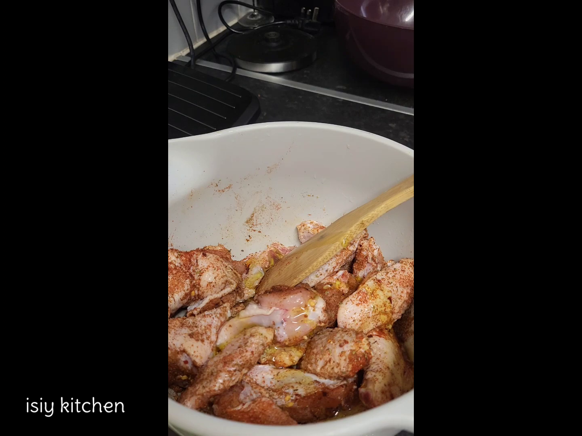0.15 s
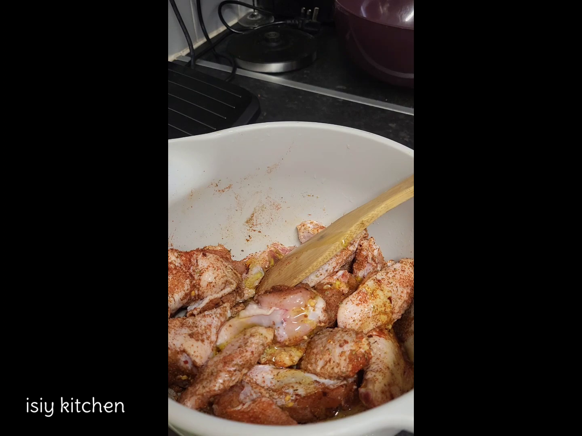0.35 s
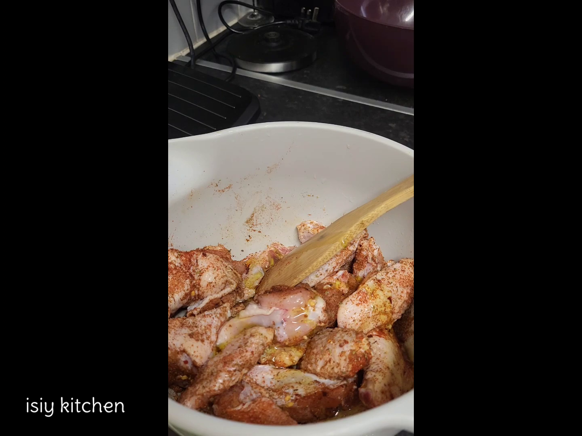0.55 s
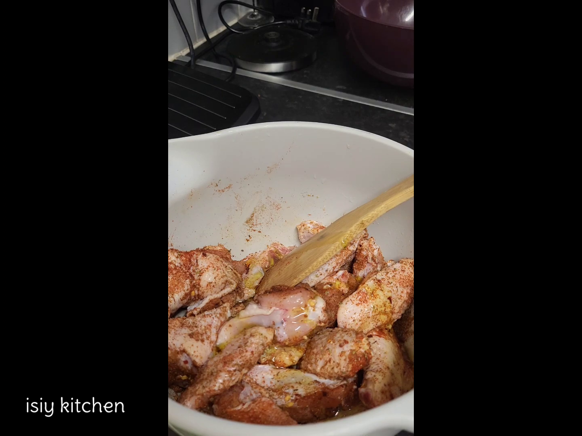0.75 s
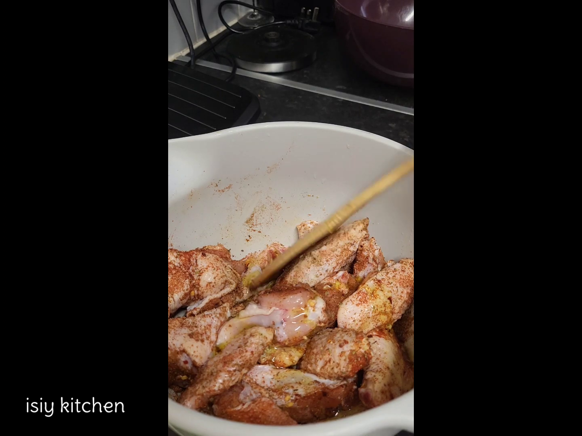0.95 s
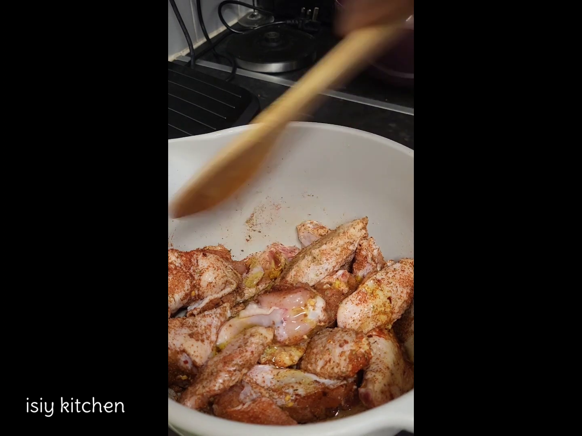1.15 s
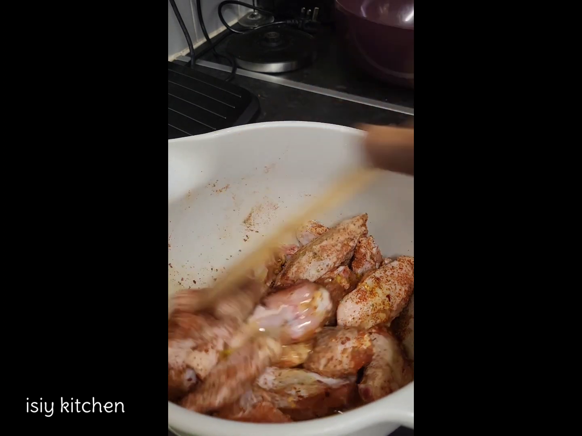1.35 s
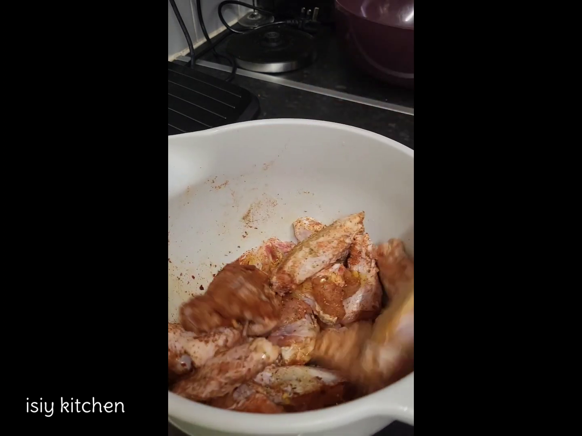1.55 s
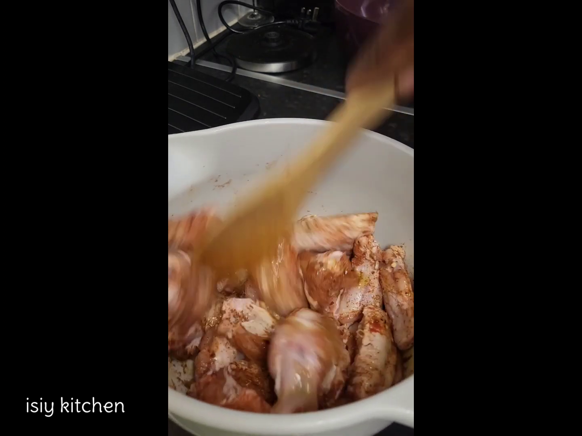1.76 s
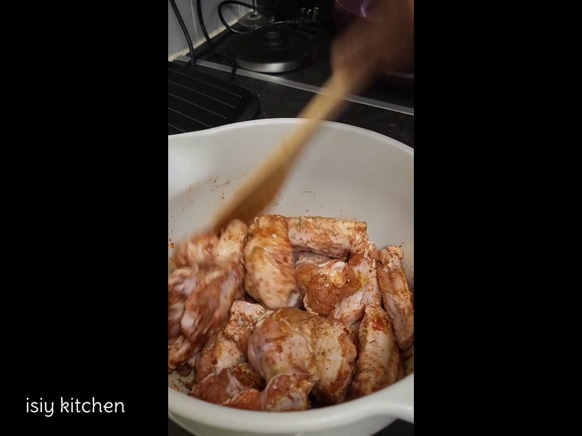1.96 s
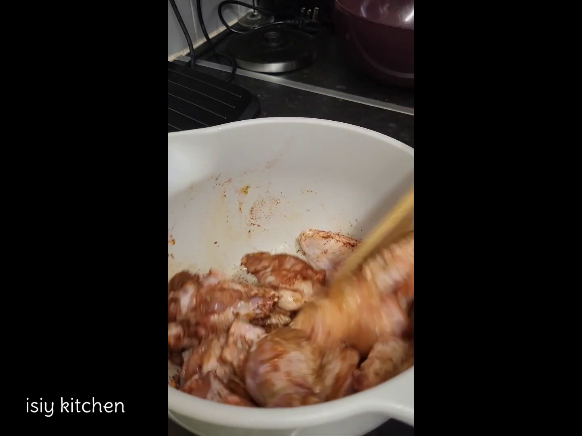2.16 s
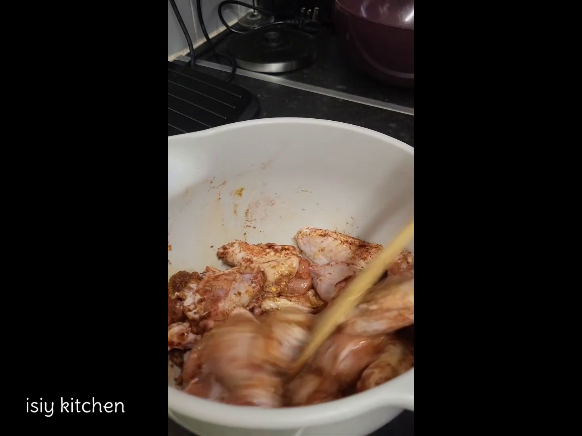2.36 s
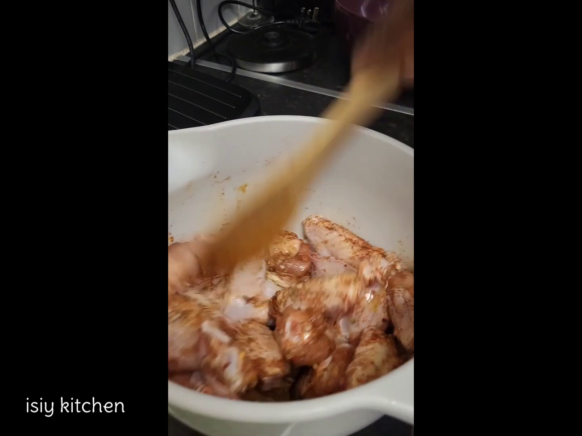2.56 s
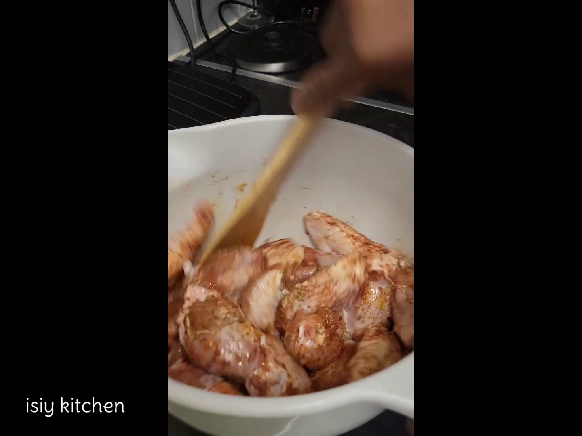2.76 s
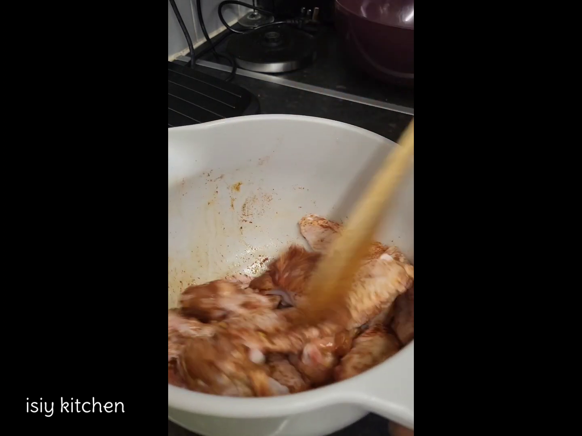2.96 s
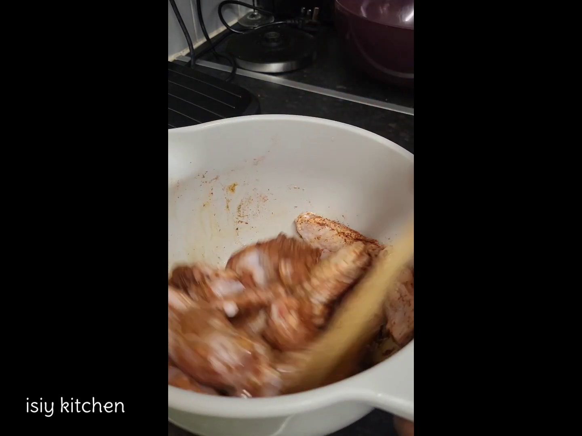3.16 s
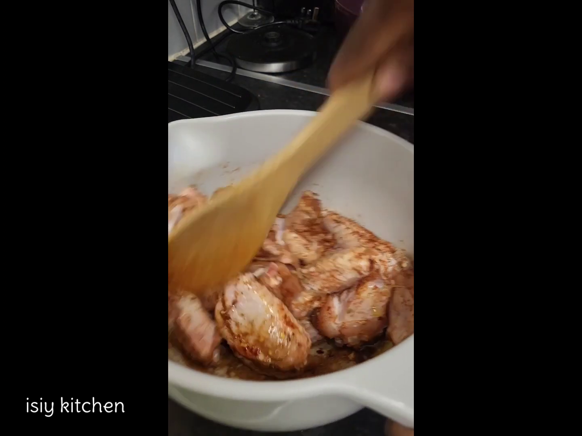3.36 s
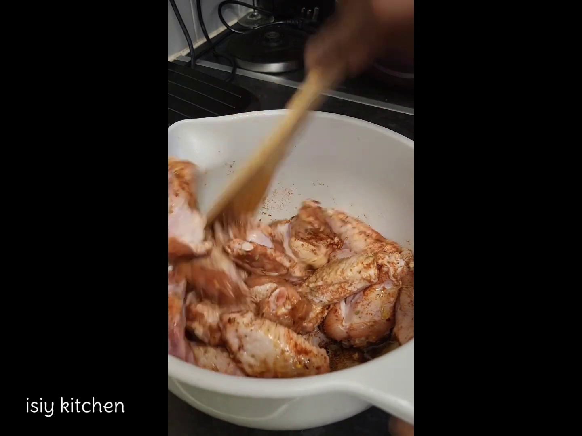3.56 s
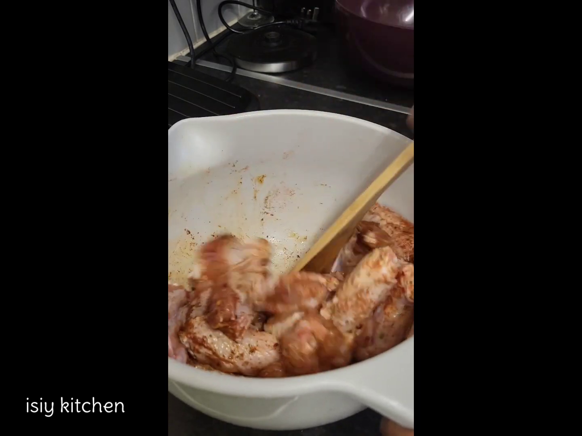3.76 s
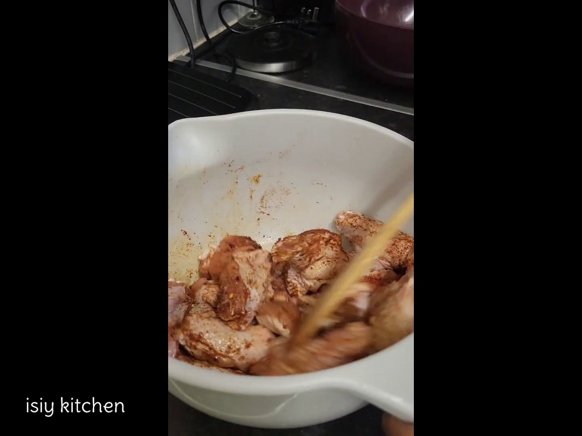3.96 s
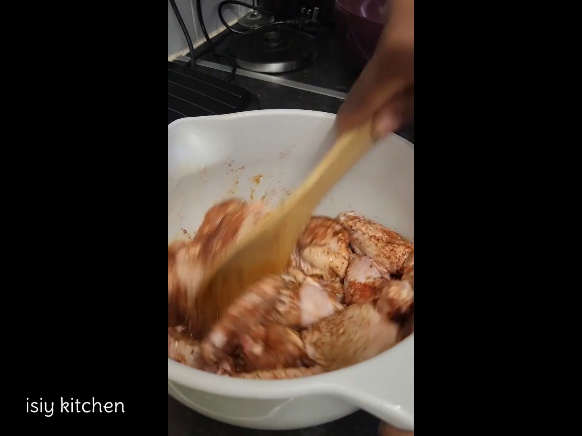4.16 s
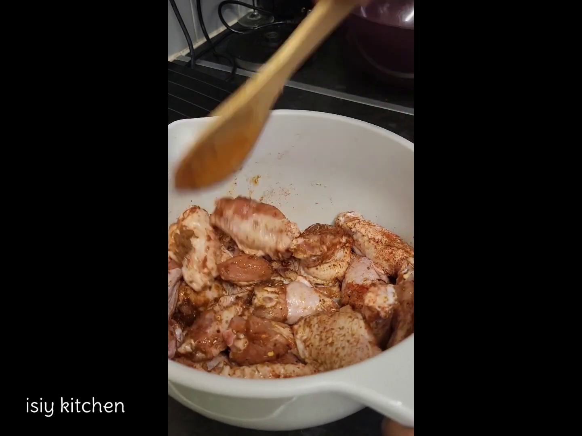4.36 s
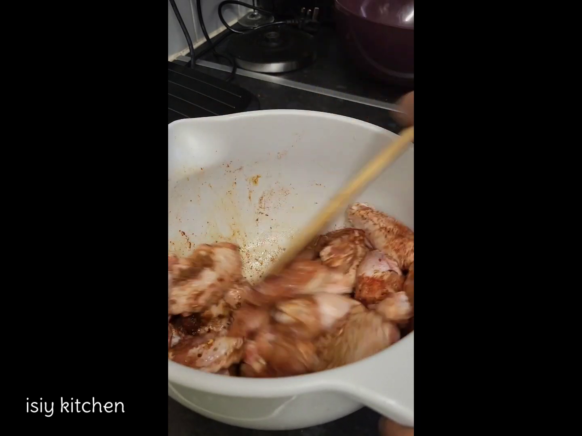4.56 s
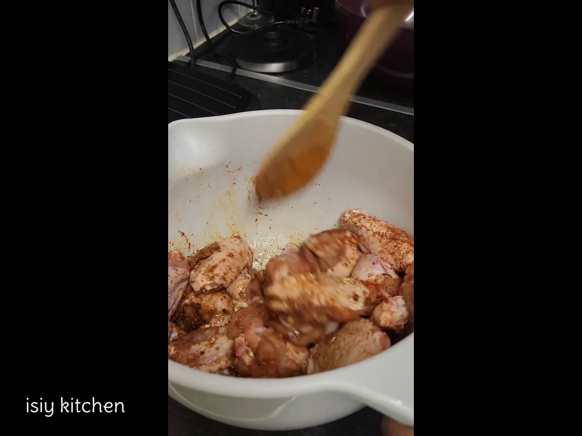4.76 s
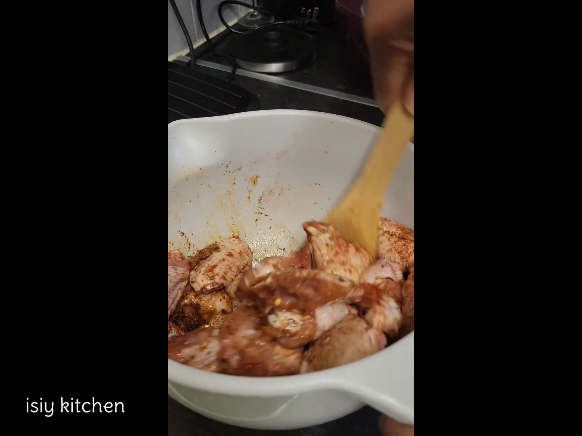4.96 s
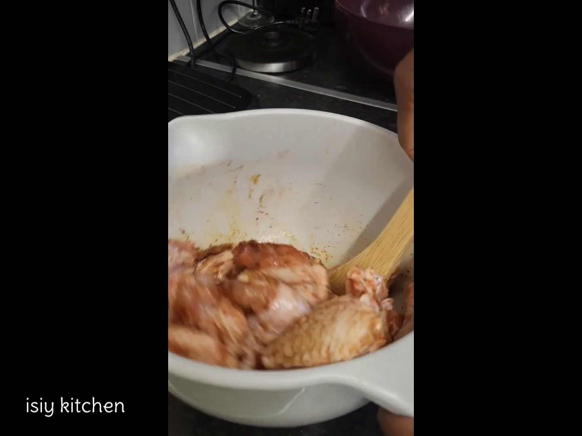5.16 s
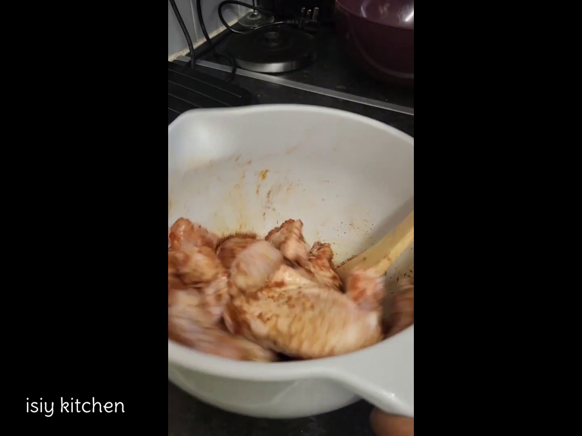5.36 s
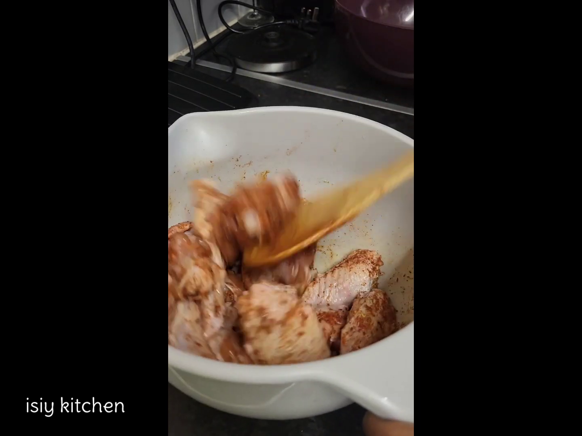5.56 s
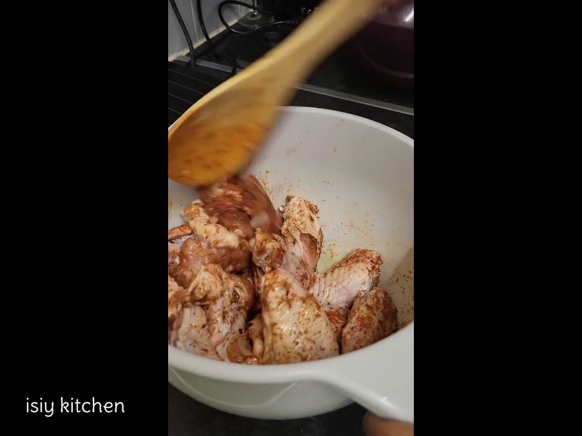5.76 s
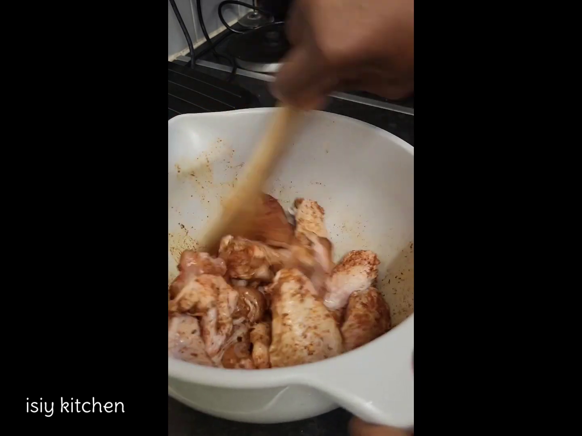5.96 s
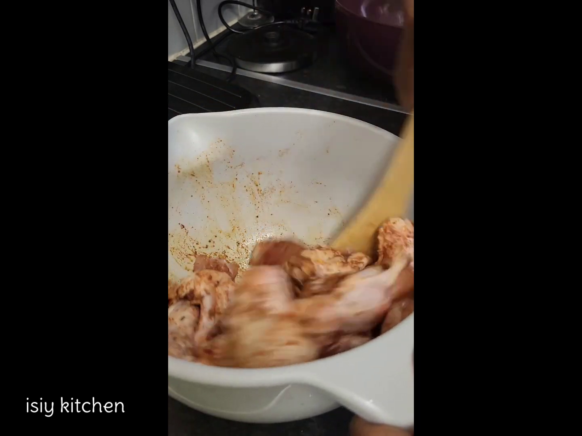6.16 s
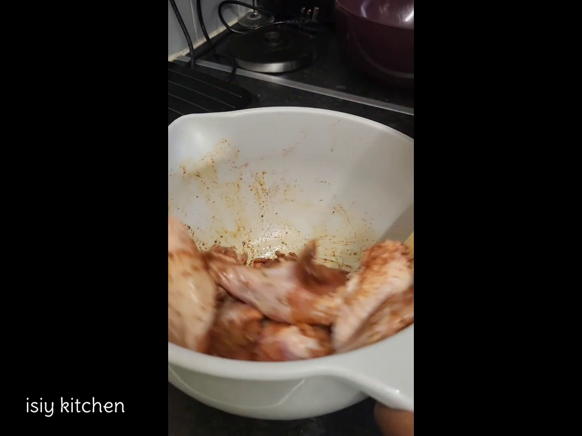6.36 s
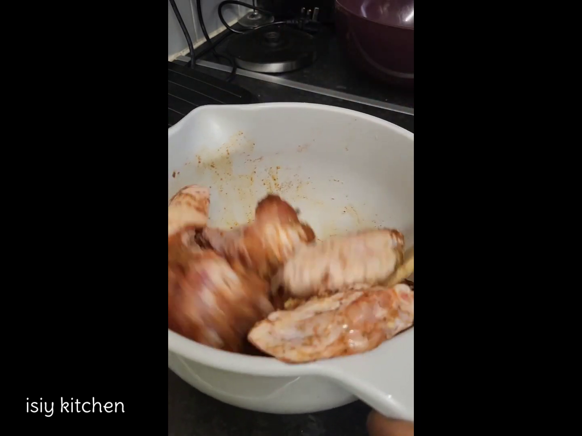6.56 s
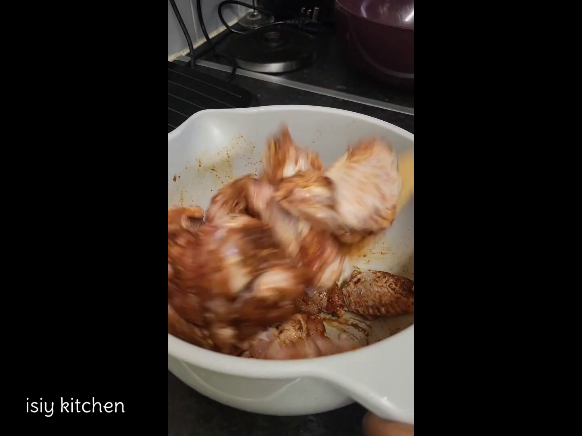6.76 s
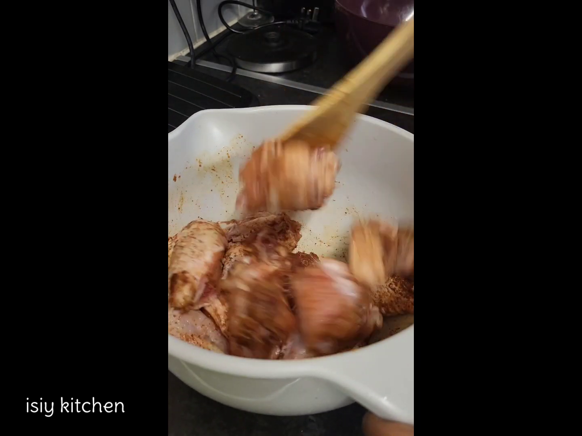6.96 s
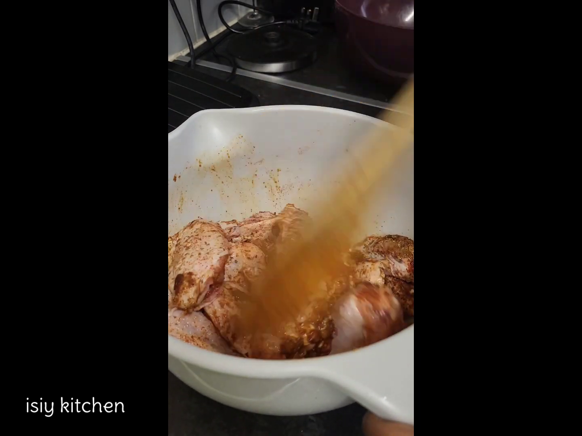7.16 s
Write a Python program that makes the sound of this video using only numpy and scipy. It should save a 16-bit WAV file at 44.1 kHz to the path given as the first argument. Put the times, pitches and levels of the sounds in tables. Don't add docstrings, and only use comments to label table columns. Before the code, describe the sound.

Close-up stirring of oily meat: squelchy scraping drags, small sticky ticks and hollow wooden knocks on a bowl, with soft worktop thuds.

```python
import sys
import numpy as np
from scipy import signal
from scipy.fft import rfft, irfft, next_fast_len
from scipy.io import wavfile
from scipy.ndimage import uniform_filter1d

SR = 44100
rng = np.random.default_rng(int(sys.argv[2]) if len(sys.argv) > 2 else 0)


def to_linear_factor(level_db):
    exponent = np.asarray(level_db, float) / 20
    return 10 ** exponent


def log_audio(samples):
    frames = np.atleast_2d(samples).T
    limited = np.clip(frames, -1, 1)
    pcm = np.round(limited * 32767).astype(np.int16)
    wavfile.write(sys.argv[1], SR, pcm)


N = 318402

# f/Hz, density/dB per Hz
AIR_COLOUR = [(76, -22.5), (130, -26), (224, -17.5), (427, -31), (491, -42), (1370, -43), (1930, -63.5),
              (2510, -24.5), (3750, -47), (8230, -31.5), (16000, -49)]
AIR_DB = -71
# f/Hz, width/Hz, level/dB
COUNTER_MODES = [
    (66, 19, 0),
    (109.5, 18, 2),
]
# peak t/s, low boom level/dB, upper boom level/dB
SWELLS = [(0.06, -51, -50), (1.02, -66, -46), (1.61, -62, -47), (1.83, -60, -38.5), (2.01, -51, -39.5),
          (2.14, -52, -43), (2.505, -38, -40), (2.72, -45, -49), (2.845, -30.5, -37), (3.33, -56.5, -47.5),
          (3.67, -63, -48), (3.752, -49, -54), (4.185, -39.5, -38.5), (4.46, -56, -41), (4.901, -44, -43),
          (4.99, -57, -30.5), (5.5, -54, -35), (5.73, -61, -47), (5.95, -53, -46), (6.12, -53, -41),
          (6.32, -52, -39), (6.72, -47, -40), (6.85, -51, -43), (7.08, -60, -39.5)]
REST_DB = [-63.5, -60.5]
SWELL_RISE, SWELL_FALL_S = 0.57, .1
BOOM_STEADINESS = 0.49
# start t/s, time to full speed/s, time to lose 20 dB/s,
# hiss level/dB, rasp level/dB
STROKES = [(0.0, 0.0033, 0.23, -72.5, -64), (0.289, 0.033, .12, -63.5, -82), (0.45, 0.046, 0.4, -73, -82.5),
           (0.7, 0.18, 5, -72, -77), (0.926, 0.026, .19, -52, -64), (1.17, 0.045, 0.2, -36, -52),
           (1.21, .06, .07, -39, -52), (1.6, 0.025, .5, -50.5, -54.5), (1.75, 0.1, 0.1, -42, -48),
           (2.0, 0.085, .2, -35.5, -38.5), (2.14, .08, .08, -42, -41), (2.24, .06, .06, -46, -50),
           (2.391, 0.076, 0.4, -41.5, -41), (2.813, 0.02, 0.23, -37, -39.5),
           (3.17, 0.13, 0.2159, -36.5, -41), (3.635, 0.046, 0.2862, -36.5, -38),
           (4.071, .12, 0.215, -40, -42), (4.483, 0.0048, 0.1648, -37, -41), (4.595, 0.02, 0.14, -46, -48),
           (4.62, .05, .04, -44, -50), (4.5, .06, .03, -44, -50), (4.899, 0.051, .15, -35, -42),
           (5.04, .11, .22, -37.5, -40.5), (5.33, 0.14, 0.08, -49, -46.5), (5.471, 0.013, 0.24, -43, -48),
           (5.956, 0.02, 0.28, -36, -37), (5.97, .065, .025, -37, -37), (6.05, .025, .04, -41, -38),
           (6.1, 0.012, 0.33, -36, -38), (6.12, .035, .05, -40, -40), (3.26, .03, .08, -42, -42),
           (3.68, .035, .04, -42, -46), (6.289, 0.037, 0.31, -38.5, -35.5), (6.812, .008, 0.05, -37, -48.5)]
# start t/s, time to lose 20 dB/s, hiss level/dB, rasp level/dB
SLIDES = [(1.475, 0.0053, -26.5, -57), (1.49, 0.1, -40.5, -54), (3.125, 0.26, -41, -36.5),
          (3.97, 0.5, -54.5, -69), (4.68, .12, -52, -62), (4.441, 0.23, -62, -58),
          (4.879, 0.37, -41.5, -38.5), (5.772, .3, -60, -69), (5.918, 0.25, -44.5, -62),
          (1.36, 0.4, -48.5, -55.5), (2.96, 0.22, -46, -52), (6.6, 0.6, -52, -51),
          (6.927, 0.08, -47.5, -55.5), (6.99, .3, -55, -69), (7.063, .09, -45, -67)]
HISS_START_DB, RASP_START_DB = -13, -12
RASP_LINGER = 1.115
STROKE_BEND, SLIDE_BEND, SLIDE_RISE_S = 1.383, 1.08, .004
JUDDER_DB, JUDDER_LAW, JUDDER_LAG_S = -49, 0.89, 0.0051
# f/Hz, density/dB per Hz
SLIP_COLOUR = [(410, 5.5), (700, -8.5), (852, -4), (1170, -2.5), (1640, -3), (2000, -4), (2160, -3),
               (2490, -5), (6400, -12.5), (7990, -11), (10100, -19.5), (14400, -18.5), (16000, -25.5)]
# f/Hz, level/dB, t60/s
BOWL_MODES = [(183, -1.5, 0.18), (234.4, -3, 0.21), (264, -0.5, .16), (331, 2.5, 0.19), (387, -34, 0.32),
              (456, -2.5, 0.24), (484, -1.5, 0.25), (545, -4, 0.25), (595, -0.5, 0.088), (632, 2.5, 0.24),
              (745, -8.5, 0.097), (900, -1, 0.038), (999, 3.5, 0.063), (1091, 6.5, 0.063),
              (1150, -4.5, 0.21), (1254, 9.5, 0.02), (1338, 9.5, 0.014), (1760, 9, 0.035),
              (1933, 10, 0.025), (2020, -8, 0.073), (2300, 10, 0.035), (2546, -9, 0.1), (2960, -7, 0.01),
              (3220, -41, 0.039)]
# middle t/s, length/s, from f/Hz, to f/Hz, level/dB
SQUELCHES = [(.06, 0.14, 162, 166, -41.5), (1.867, 0.054, 313, 270, -35.5), (2.105, 0.058, 1580, 1980, -36),
             (2.204, 0.089, 1150, 1480, -36), (2.211, 0.076, 1900, 2100, -38),
             (2.509, 0.055, 2160, 2380, -41), (2.603, 0.15, 1230, 1440, -43.5),
             (2.857, 0.094, 331, 331, -39), (3.178, 0.083, 331, 331, -51), (4.166, 0.083, 418, 580, -42.5),
             (4.245, 0.13, 1160, 1490, -40), (4.28, 0.072, 1910, 2200, -40.5),
             (4.97, 0.091, 2050, 2180, -37), (5.186, 0.096, 1100, 1540, -35.5), (5.507, 0.1, 331, 331, -30),
             (6.066, 0.033, 1480, 1700, -32), (6.13, 0.073, 1430, 1970, -36), (6.756, 0.09, 334, 564, -41),
             (5.74, 0.13, 207, 203, -45), (0.068, 0.12, 515, 465, -57), (.11, .12, 330, 330, -57),
             (.07, .12, 820, 800, -64), (.16, .2, 190, 170, -58), (1.3, .4, 160, 170, -60),
             (4.17, 0.091, 255, 260, -42.5), (6.716, 0.0448, 342, 331, -31), (3.441, .14, 235, 220, -51),
             (2.393, 0.033, 293, 295, -38)]
# t/s, ring at 400-800 Hz
# level/dB, then relative to it thump level/dB, clack level/dB, tick level/dB
KNOCKS = [(1.593, -16.5, -10, 4.5, -3), (1.845, -26, 0, -6, -15), (1.993, -21, -2, -1.5, 6.5),
          (2.387, -28, -0.5, -35, -33), (2.802, -24, -6, 7, 0.5), (2.823, -22.5, 6.5, -22, -7),
          (3.122, -12, -14, 5.5, 9.5), (3.636, -16, -6, -2, 6.5), (3.746, -22, -8, 0, 7.5),
          (4.438, -14, -9, -2.5, 3), (4.484, -30, -2.5, 1.5, -11), (4.874, -17.5, 1.5, 2, 6),
          (5.166, -29, -6, -6, 10), (5.467, -12.5, -21, -5, -6), (5.482, -17, -2, -13, 3),
          (5.916, -27, -2.5, 12.5, 6), (5.957, -30.5, 0, -4, -12), (6.063, -29, -1.5, -24, 2),
          (6.289, -17, -6, 8, 2.5), (6.701, -19, 0, -8.5, -5), (6.799, -21.5, -15, -12, -14),
          (6.925, -11, -6, -17, -12), (7.061, -27, 7, -14.5, 0.5),
          (0.015, -50, 11, -2, -23), (0.833, -73, 4, 2, 14), (0.953, -41.5, 0.5, -1.5, -13),
        (0.997, -46.5, 7, -2, -5), (1.467, -47, -4, -9, -5), (1.476, -37, 1.5, 13, 20),
        (2.719, -34.5, 3, 8.5, 2), (3.273, -37, -16, -7, 8), (3.284, -32.5, -0.5, -17, 2),
        (4.517, -32, 2.5, -15, -10), (5.218, -33, -3, 10, 7), (5.388, -36.5, -20, 5, 7.5),
        (5.706, -48, 13.5, 4, 2), (5.749, -53.5, 13, 12, 2), (5.775, -47, -8, 8, 15),
        (6.103, -34, -2, -17, 18.5), (6.543, -42, -15.5, -4, -5), (6.822, -34, -14, -18, 12.5),
        (6.831, -28, -8, -14, -13)]
# t/s, ring level/dB, thump level/dB, clack
# level/dB, tick level/dB
BUMPS = [(1.033, -50, 8, -3, 3), (1.812, -43, -3, -10, -20), (2.026, -34, 0, -10, -20),
         (2.095, -32, 0, -8, -15), (2.466, -36, 3, -10, -20), (2.563, -40, -8, 5, -8),
         (2.631, -42, -8, 4, -8), (3.728, -33, 3, -10, -20), (4.137, -40, 0, 3, -10),
         (4.164, -36, 5, -10, -20), (4.376, -47, 3, -10, -20), (4.611, -44, -8, 5, -3),
         (4.995, -37, -4, -8, -20), (5.355, -44, -5, -8, -20), (5.996, -36, -10, 6, 3),
         (6.171, -31, -8, -6, -12), (6.333, -33, -8, 6, -5), (6.782, -32, -8, -12, -20),
         (7.026, -49, -8, 0, 4), (.045, -56, 8, -3, -20), (.09, -58, 8, -3, -20)]
KNOCK_BANDS_HZ = [400, 800, 1500, 3500]
CRACK_DB, CRACK_PER_RING = -30, -0.52
DETUNE, CHATTER_BRIGHT_DB = .01, -6
# t/s, f/Hz, level/dB
MOTOR = [
    (0.62, 55, -61),
    (0.678, 58.9, -56),
    (1.282, 63.7, -50.5),
    (1.3, 62, -44.5),
    (1.494, 66, -41.5),
    (1.694, 67.8, -43),
    (1.852, 66.4, -36),
    (1.95, 66.3, -60),
]
# t/s, peak level/dB, f/Hz
TICKS = [(0.9986, -38, 5280), (1.0331, -38, 6340), (1.0634, -51, 6180), (1.4192, -36, 7940),
         (2.0358, -27, 5080), (2.2964, -31, 7710), (2.373, -28, 6610), (2.4024, -37, 6460),
         (2.4239, -29, 5700), (2.4384, -32, 8170), (2.4987, -27, 5990), (2.6444, -32, 5820),
         (2.6824, -36, 14200), (2.7177, -36, 7780), (2.7644, -46, 5300), (2.9607, -29, 8190),
         (2.9856, -35, 6910), (2.9994, -36, 6330), (3.0295, -34, 5980), (3.0364, -33, 6290),
         (3.0844, -43, 7890), (3.9394, -41, 7410), (3.9894, -43, 7880), (4.0213, -38, 7780),
         (4.0464, -42, 7740), (4.0786, -35, 5230), (4.4922, -25, 8260), (4.5164, -27, 7410),
         (4.6543, -29, 6300), (4.6614, -29, 5410), (4.6654, -25, 10600), (4.6714, -31, 5200),
         (4.9028, -24, 5190), (5.7658, -39, 13900), (5.7793, -37, 8450), (5.9674, -24, 8230),
         (6.7246, -32, 5100), (6.7644, -41, 9730), (6.7804, -38, 7940), (6.8884, -38, 8510),
         (7.0254, -45, 6340), (7.0394, -36, 8410), (7.1057, -35, 9600), (7.1501, -45, 5410)]
TICK_CYCLES, TICK_DB, TICK_LEFT_DB, TICK_BLUR = 4.5, -1.5, 1.5, .3
# t/s, peak level/dB
CRACKS = [(1.001, -50), (1.476, -27), (1.995, -44), (2.371, -45), (2.422, -50), (2.8, -38), (3.12, -11),
          (3.636, -21.5), (4.872, -21.5), (5.775, -34.5), (5.915, -22), (6.817, -18)]
# f/Hz, t60/s
KITCHEN_DECAY = [(150, 0.1), (500, 0.13), (2000, 0.19), (6000, 0.067), (14000, 0.036)]
# f/Hz, likeness/0-1
PORT_LIKENESS = [(60, 0.96), (240, 0.89), (500, 0.7), (1000, 0.51), (2000, 0.68), (4000, 0.039)]
# f/Hz, level/dB
PORT_BALANCE = [(60, 1.5), (150, -0.5), (380, 2.5), (950, 4.5), (2380, 2.5), (5980, 0), (15000, 1)]
LEFT_LEAD = 4


def evened(x):
    return x / np.sqrt(np.mean(x ** 2) + 1e-20)


def read(points, hz):
    f, value = np.transpose(points)
    return np.interp(np.log(hz + 1), np.log(f + 1), value)


def curves(rows):
    s, *columns = np.transpose(rows)
    return [np.interp(np.arange(N) / SR, s, column) for column in columns]


def add(mix, s, sound):
    part = mix[:, round(s * SR):][:, :sound.shape[1]]
    part += sound[:, :part.shape[1]]


def shaped(x, gain):
    size = next_fast_len(N)
    return irfft(rfft(x, size) * gain(np.fft.rfftfreq(size, 1 / SR)), size)[..., :N]


def ringing(hz, modes):
    return np.sqrt(sum(to_linear_factor(2 * db) / (1 + (2 * (hz - f) / w) ** 2) for f, w, db in modes))


def milliseconds():
    return np.arange(N * 1000 // SR + 1) / 1000


def summed(levels_db):
    total = 10 * np.log10((to_linear_factor(levels_db) ** 2).sum(axis=0) + 1e-12)
    return np.interp(np.arange(N) / SR, np.arange(len(total)) / 1000, total)


def air():
    hiss = shaped(rng.standard_normal((2, N)), lambda hz: to_linear_factor(read(AIR_COLOUR, hz)))
    return to_linear_factor(AIR_DB) * evened(hiss)


def counter():
    s, *tops = np.transpose(SWELLS)[..., None]
    t = milliseconds() - s
    slope = -20 * np.maximum(t, -t / SWELL_RISE) / SWELL_FALL_S
    out = 0
    for mode, top, rest in zip(COUNTER_MODES, tops, REST_DB):
        level_db = summed(np.vstack([top + slope, rest + 0 * t[:1]]))
        boom = shaped(rng.standard_normal((2, N)), lambda hz: ringing(hz, [mode]) ** 2)
        boom = boom / uniform_filter1d(boom[0] ** 2, 800) ** (BOOM_STEADINESS / 2)
        out = out + to_linear_factor(level_db) * evened(boom)
    return out


def sweep(start, rise, fall, top_db, start_db, bend):
    t = milliseconds() - start
    fade = -20 * (np.maximum(t - rise, 0) / fall) ** bend
    return top_db + np.where(t < 0, -99, start_db * np.maximum(1 - t / rise, 0) + fade)


def motion():
    slides = [(s, SLIDE_RISE_S, *rest) for s, *rest in SLIDES]
    start, rise, fall, hiss_db, rasp_db = np.transpose(STROKES + slides)[..., None]
    bend = np.repeat([STROKE_BEND, SLIDE_BEND], [len(STROKES), len(SLIDES)])[:, None]
    hiss = sweep(start, rise, fall, hiss_db, HISS_START_DB, bend)
    rasp = sweep(start, rise, RASP_LINGER * fall, rasp_db, RASP_START_DB, bend)
    return summed(hiss), summed(rasp)


def slips(per_s, spread_db, clump_db):
    clumps = evened(uniform_filter1d(uniform_filter1d(rng.standard_normal(N), 130), 130))
    size = to_linear_factor(spread_db * np.minimum(rng.exponential(1, N), 5) + clump_db * clumps)
    return size * (rng.random(N) < per_s / SR) * rng.standard_normal((2, N))


def pops(clicks):
    t, turn = np.arange(64) / SR, np.arange(N) % 4
    pitches = np.geomspace(3600, 11500, num=4)[:, None]
    pips = np.sin(2 * np.pi * pitches * t) * np.hanning(len(t)) ** 2
    return sum(signal.oaconvolve(clicks * (turn == k), pip[None], axes=1)[:, :N] for k, pip in enumerate(pips))


def patchy(x, depth_db):
    z = signal.stft(x, nperseg=512, noverlap=256)[2]
    blots = rng.standard_normal(z.shape[:0:-1]).T
    blots = uniform_filter1d(uniform_filter1d(blots, 7, 0), 4, 1)
    return signal.istft(z * to_linear_factor(depth_db * evened(blots)), nperseg=512, noverlap=256)[1][:, :N]


def drag():
    hiss_db, rasp_db = motion()
    t = np.arange(N) / SR
    wall_db = JUDDER_DB + JUDDER_LAW * (np.interp(t - JUDDER_LAG_S, t, rasp_db) + 44.5)
    modes = [(f, 4.6 / t60, db) for f, db, t60 in BOWL_MODES]

    def low(hz):
        return 1 / (1 + (hz / 2600) ** 4)

    def damped(hz):
        return 1 / (1 + (hz / 730) ** 8.0) / (1 + (190 / (hz + 1)) ** 3)

    fine = evened(slips(16000, 0.92, 0.5)) + 0.15 * evened(pops(slips(260, 1.8, 0.79)))
    hiss = shaped(fine, lambda hz: to_linear_factor(read(SLIP_COLOUR, hz)) * np.sqrt(1 - low(hz)))
    rasp = shaped(slips(5500, 1.5, 1.3),
                  lambda hz: to_linear_factor(read(SLIP_COLOUR, hz)) * low(hz) * (1 + ringing(hz, modes)))
    wall = shaped(slips(2200, 2.4, 2.6), lambda hz: ringing(hz, modes) ** 3.3 * damped(hz))
    layers = [(hiss_db + 4.0, patchy(hiss, 2.08)), (rasp_db + 0.5, patchy(rasp, 5.0)), (wall_db + 0.5, wall)]
    return sum(to_linear_factor(db) * evened(x) for db, x in layers)


def resonate(x, hz, width):
    turn = np.exp(2j * np.pi * np.cumsum(hz) / SR)
    r = np.exp(-np.pi * width / SR)
    return 2 * (turn * signal.lfilter([1 - r], [1, -r], x / turn)).real


def squelch():
    mix = np.zeros((2, N))
    noises = rng.standard_normal((len(SQUELCHES), 2, 9000))
    for (s, length, from_hz, to_hz, db), noise in zip(SQUELCHES, noises):
        noise = noise[:, :min(int(length * SR), 9000)]
        hz = np.linspace(from_hz, to_hz, noise.shape[1])
        sung = resonate(resonate(noise, hz, 0.34 * to_hz), hz, 0.33 * to_hz)
        swell = signal.windows.tukey(len(hz), .7)
        add(mix, max(s - length / 2, 0), to_linear_factor(db) * evened(sung) * swell)
    return mix


def crack(db, luck):
    t = np.arange(600) / SR
    x = signal.lfilter(*signal.butter(2, [2300, 8500], "band", fs=SR), luck[-1200:].reshape(2, -1))
    x = x * to_linear_factor(-60 * t / 0.017) * (1 - np.exp(-t / 0.00058))
    return np.pad(to_linear_factor(db) * x / abs(x).max(), [(0, 0), (80, 0)])


def knock(ring_db, thump_db, clack_db, tick_db, crack_db, luck):
    t = np.arange(int(.17 * SR)) / SR
    hz, db, t60 = np.transpose(BOWL_MODES)[..., None]
    count = len(BOWL_MODES)
    share, turn = luck[:2 * count].reshape(2, -1, 1)
    apart = 1.09 * np.arccos(np.clip(read(PORT_LIKENESS, hz), 0, 1)) * np.sign(turn)
    late = np.maximum(t - .0019 - 0.019 / np.sqrt(hz), 0)
    loss = 0.82 * to_linear_factor(-60 * late / (0.17 * t60)) + 0.18 * to_linear_factor(-60 * late / t60)
    rise = 1 - np.exp(-(late * hz * 2.8) ** 2)
    detuned_hz = hz * (1 + DETUNE * luck[50:50 + count, None])
    phase = 2 * np.pi * detuned_hz * late + 0.62 * turn
    modes = to_linear_factor(db + 1.36 * share) * loss * rise * np.sin([phase, phase + apart])
    band = np.searchsorted(KNOCK_BANDS_HZ, hz[:, 0])
    out = 0
    for k, band_db in enumerate([thump_db, 0, clack_db, tick_db]):
        group = modes[:, band == k].sum(axis=1)
        out = out + to_linear_factor(band_db) * group / abs(group).max()
    add(out, 0, crack(crack_db, luck))
    return -to_linear_factor(ring_db + 3.5) * out


def spoon(blows):
    mix, blows = np.zeros((2, N)), sorted(blows)
    dull = signal.butter(2, 1000, fs=SR)
    slap_at = np.arange(220, 4400, 110)
    slap_fade = to_linear_factor(-11 - 60 * slap_at / SR / .14)
    for (s, *levels), luck in zip(blows, rng.standard_normal((len(blows), 1400))):
        crack_db = levels[-1] * .5 + CRACK_DB + CRACK_PER_RING * levels[0]
        blow = knock(*levels, crack_db, luck)
        slaps = np.zeros(4400)
        slaps[slap_at] = np.clip(luck[80:118], -1.6, 1.6) ** 3 * slap_fade
        dulled = signal.lfilter(*dull, blow) + to_linear_factor(CHATTER_BRIGHT_DB) * blow
        add(mix, s, blow)
        add(mix, s, to_linear_factor(-11.5) * signal.fftconvolve(dulled, slaps[None], axes=1))
    return signal.lfilter(*signal.butter(2, 85, "high", fs=SR), mix)


def motor():
    hz, level_db = curves(MOTOR)
    start, end = MOTOR[0][0], MOTOR[-1][0]
    on = np.interp(np.arange(N) / SR, [start, start + 0.058, end - .04, end], [0, 1, 1, 0])
    wobble = uniform_filter1d(rng.standard_normal((2, N)), size=900)
    wobble = evened(uniform_filter1d(wobble, size=900))
    turn = 2 * np.pi * np.cumsum(hz) / SR + 0.15 * wobble[0]
    note = np.sin(turn) + to_linear_factor(-22) * np.sin(2 * turn) + to_linear_factor(-24) * np.sin(3 * turn)
    return np.sqrt(2) * to_linear_factor(level_db + 1.2 * wobble[1]) * on * note


def ticks():
    mix, t = np.zeros((2, N)), np.arange(200) / SR
    sides = np.array([[.5], [-.5]])
    for (s, db, hz), luck in zip(TICKS, rng.standard_normal((len(TICKS), 2, 200))):
        age = t * hz / TICK_CYCLES * 4
        ragged = 1 + TICK_BLUR * evened(uniform_filter1d(luck, size=3))
        pip = np.sin(2 * np.pi * hz * t) * age * np.exp(1 - age) * ragged
        pip = np.array([np.roll(pip[0], LEFT_LEAD), pip[1]])
        add(mix, s, to_linear_factor(db + TICK_DB + TICK_LEFT_DB * sides) * pip / abs(pip).max())
    return mix


def cracks():
    mix = np.zeros((2, N))
    for (s, db), luck in zip(CRACKS, rng.standard_normal((len(CRACKS), 1200))):
        add(mix, s, crack(db, luck))
    return mix


def paired(x):
    def same(hz):
        return np.clip(read(PORT_LIKENESS, hz), 0, 1)

    right = shaped(x[0], same) + shaped(x[1], lambda hz: np.sqrt(1 - same(hz) ** 2))
    return np.array([x[0], right])


def kitchen(x):
    taps = np.zeros((2, SR // 2))
    at = np.arange(200, SR // 2 - 20, 20) + rng.integers(0, 20, (2, (SR // 2 - 201) // 20))
    np.put_along_axis(taps, at, rng.choice([-1., 1.], at.shape), 1)
    hz, t, z = signal.stft(taps, SR, nperseg=256)
    decay = to_linear_factor(-60 * t / read(KITCHEN_DECAY, hz)[:, None])
    tail = signal.istft(z * decay, SR, nperseg=256)[1]
    return signal.fftconvolve(x, tail / np.linalg.norm(tail[0]), axes=1)[:, :N]


def scene():
    hits = spoon(KNOCKS)
    spread = paired(drag() + squelch() + counter() + air())
    hits = hits + cracks()
    room = kitchen(to_linear_factor(-12.5) * hits + to_linear_factor(-14.5) * spread)
    return hits + spread + room + motor() + ticks() + spoon(BUMPS)


def roll_off(x):
    return signal.sosfilt(signal.butter(12, 16490, fs=SR, output="sos"), x)


def record(dry):
    def band(hz):
        return 1 / np.sqrt((1 + (hz / 15400) ** 130) * (1 + (44 / (hz + 1)) ** 7))

    def lead(hz):
        return np.exp(2j * np.pi * hz * LEFT_LEAD / SR)

    left = shaped(dry[0], lambda hz: to_linear_factor(read(PORT_BALANCE, hz) / 2) * lead(hz))
    right = shaped(dry[1], lambda hz: to_linear_factor(-read(PORT_BALANCE, hz) / 2))
    return roll_off(shaped(np.clip([left, right], -1, 1), band))


dry = scene()
out = record(dry)
log_audio(out)
```